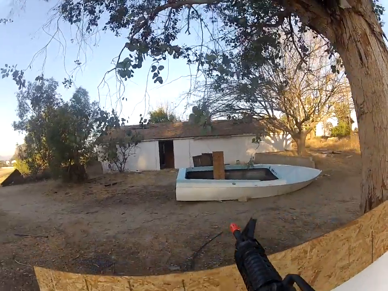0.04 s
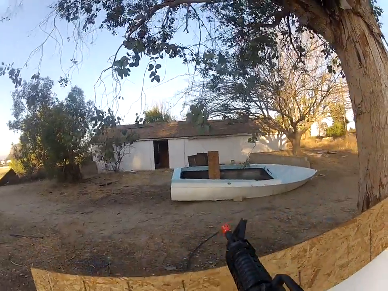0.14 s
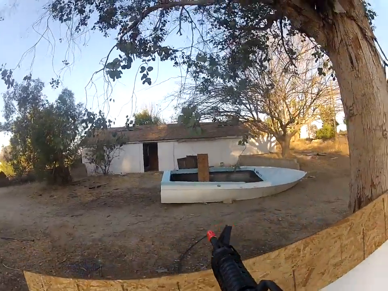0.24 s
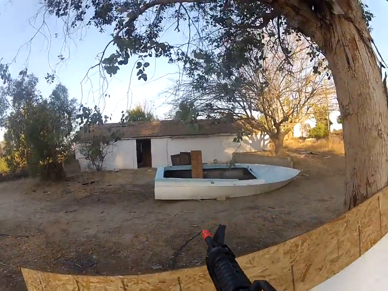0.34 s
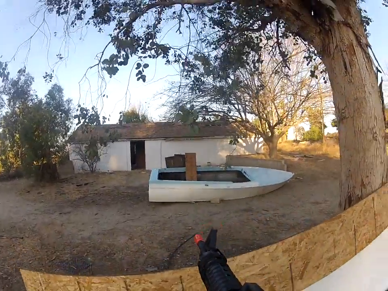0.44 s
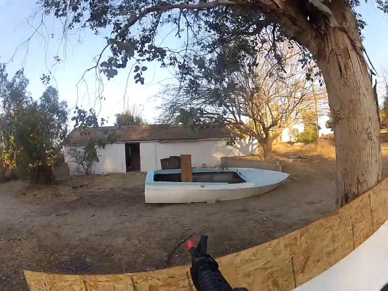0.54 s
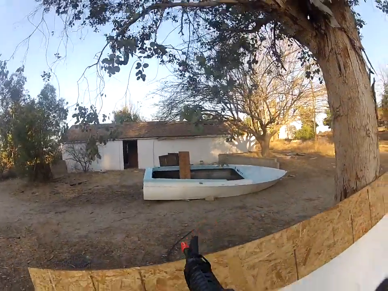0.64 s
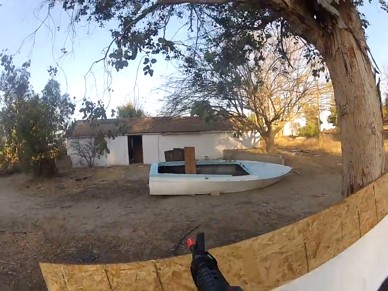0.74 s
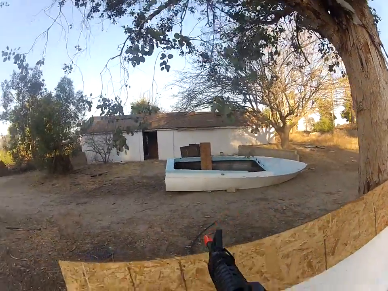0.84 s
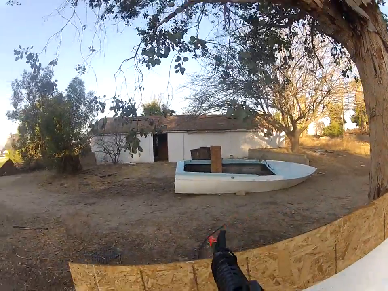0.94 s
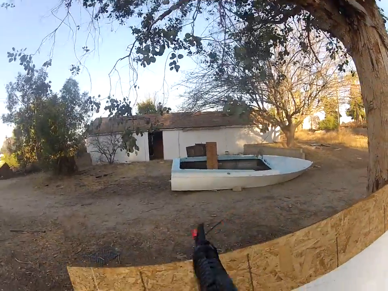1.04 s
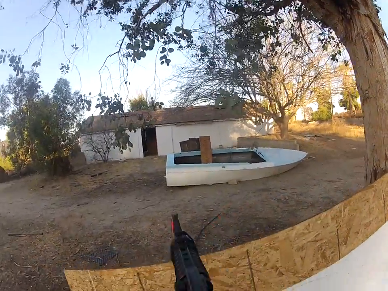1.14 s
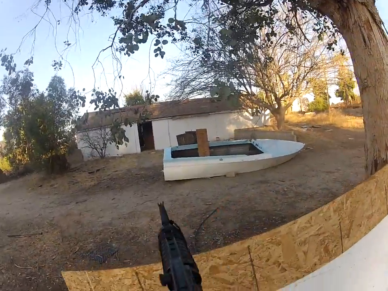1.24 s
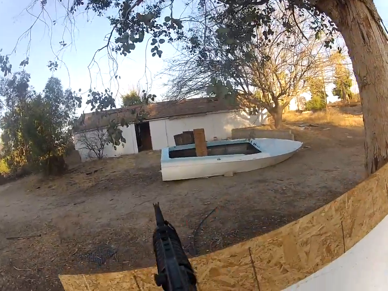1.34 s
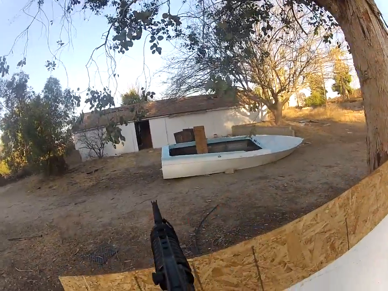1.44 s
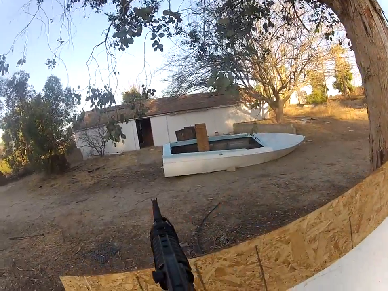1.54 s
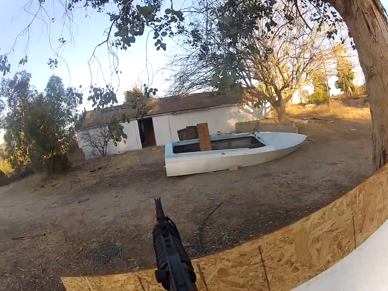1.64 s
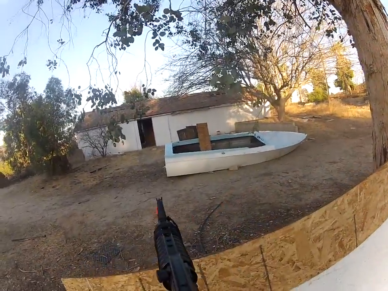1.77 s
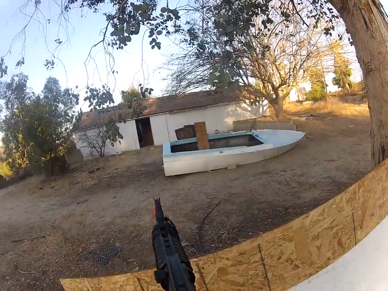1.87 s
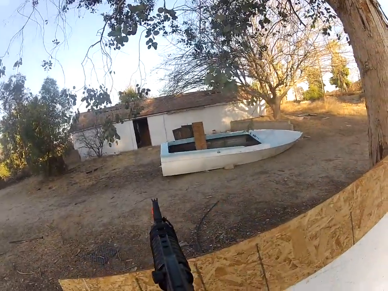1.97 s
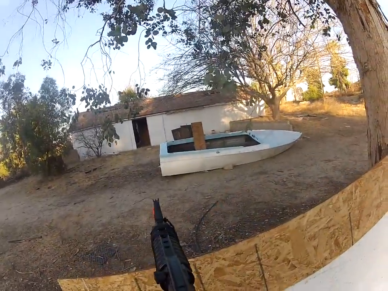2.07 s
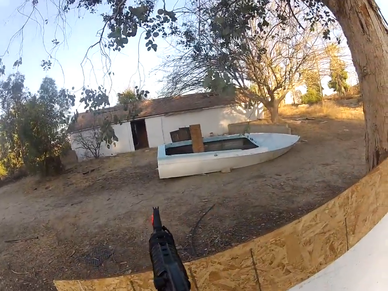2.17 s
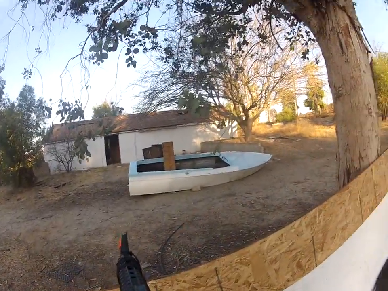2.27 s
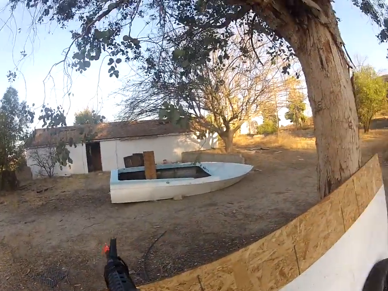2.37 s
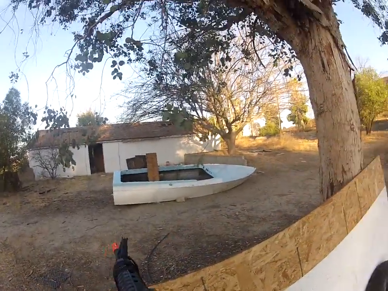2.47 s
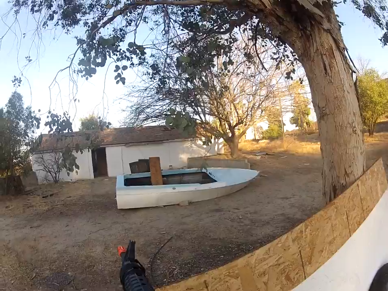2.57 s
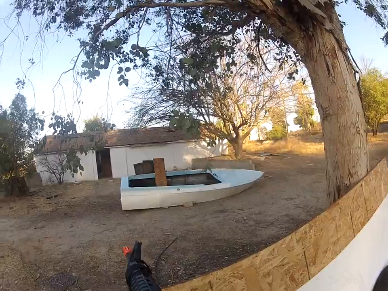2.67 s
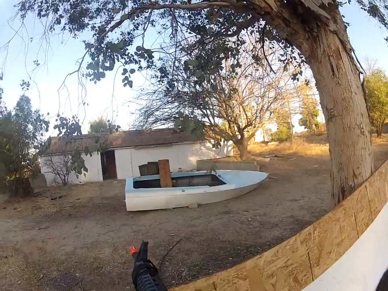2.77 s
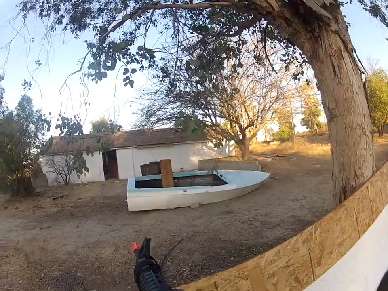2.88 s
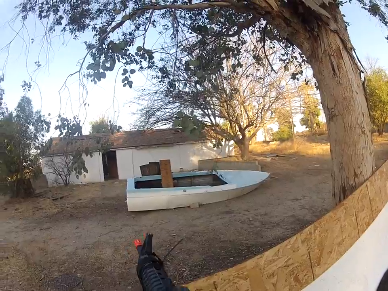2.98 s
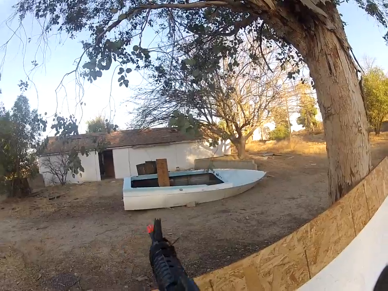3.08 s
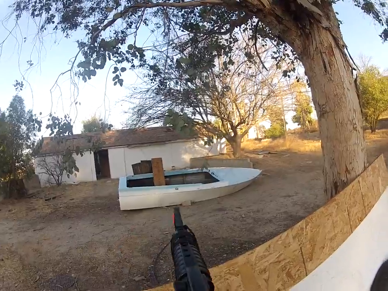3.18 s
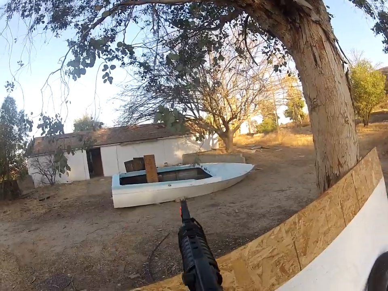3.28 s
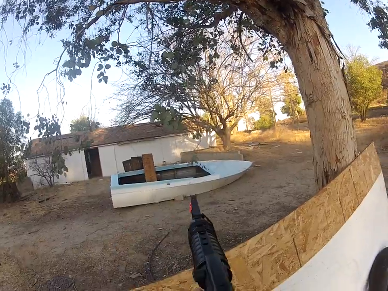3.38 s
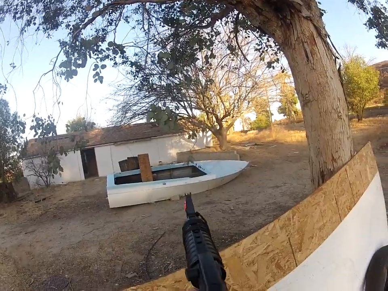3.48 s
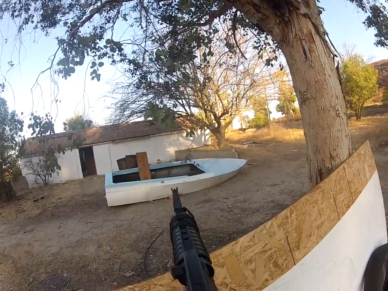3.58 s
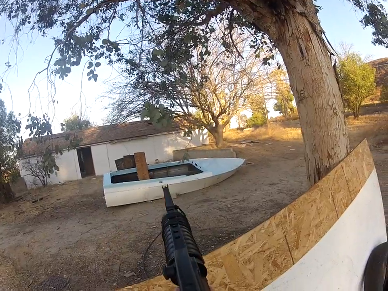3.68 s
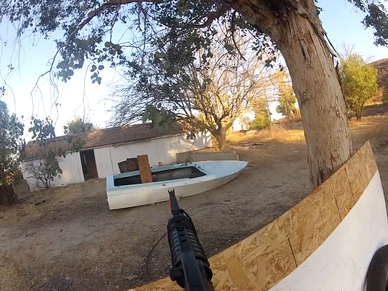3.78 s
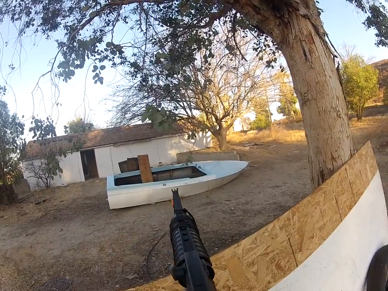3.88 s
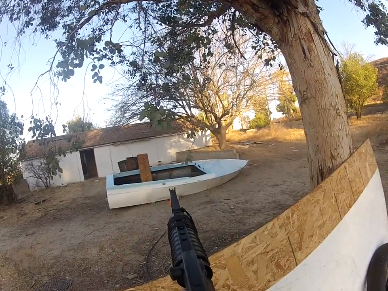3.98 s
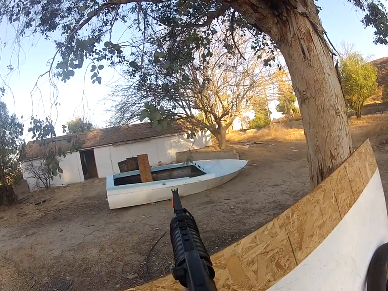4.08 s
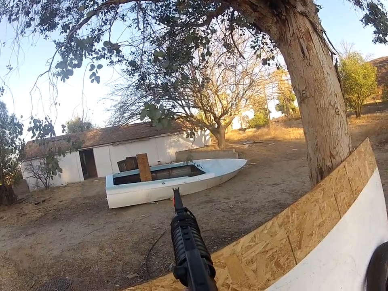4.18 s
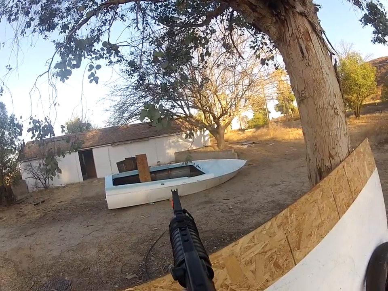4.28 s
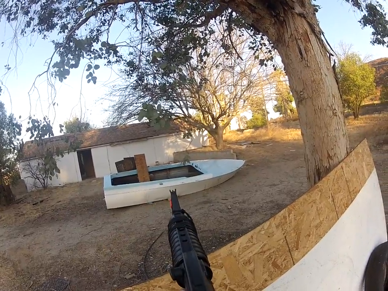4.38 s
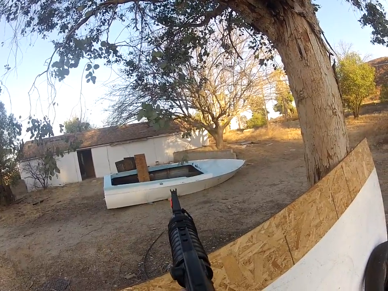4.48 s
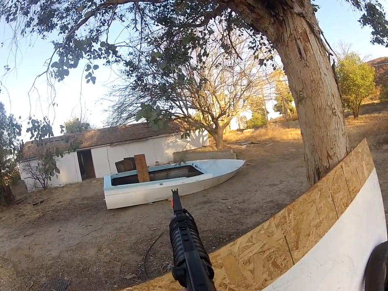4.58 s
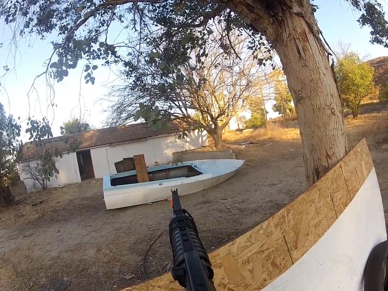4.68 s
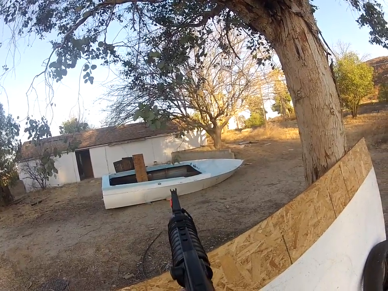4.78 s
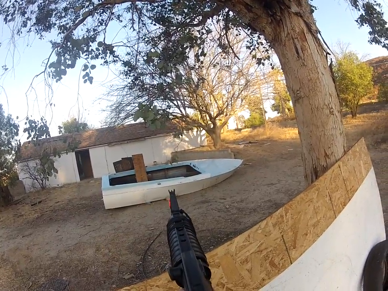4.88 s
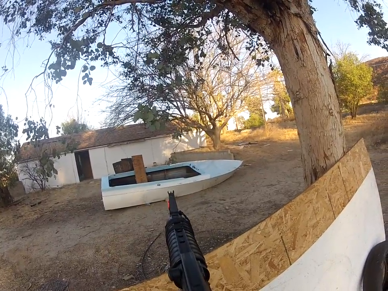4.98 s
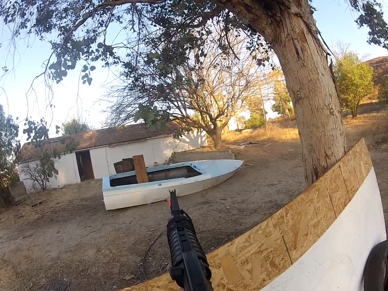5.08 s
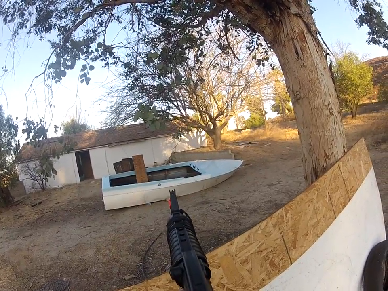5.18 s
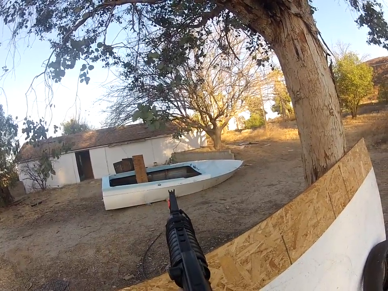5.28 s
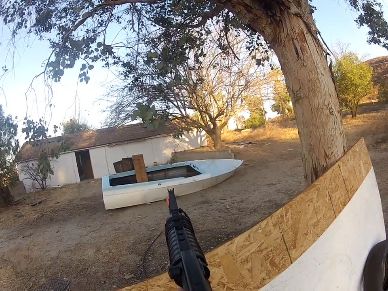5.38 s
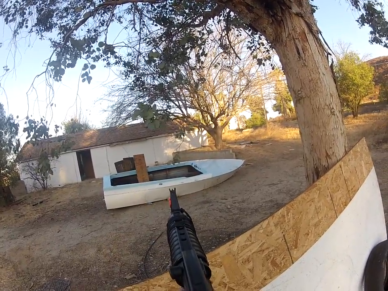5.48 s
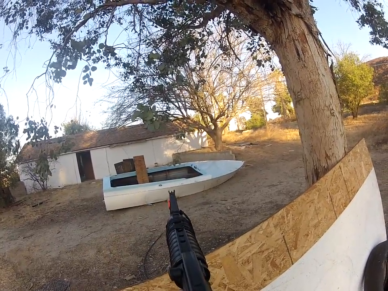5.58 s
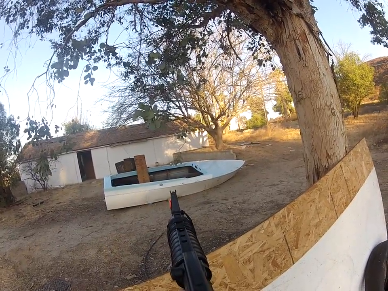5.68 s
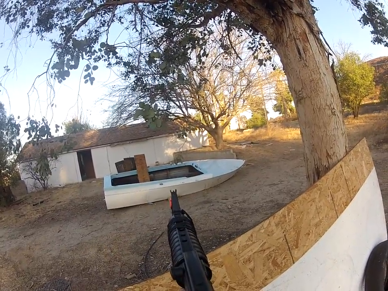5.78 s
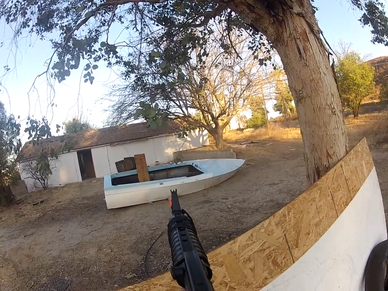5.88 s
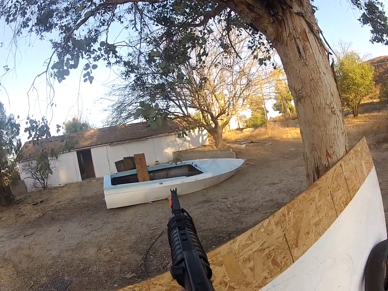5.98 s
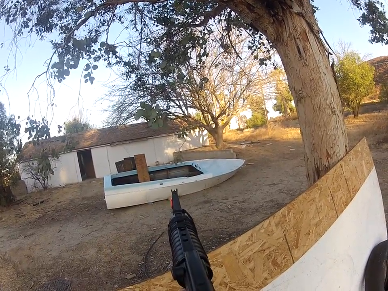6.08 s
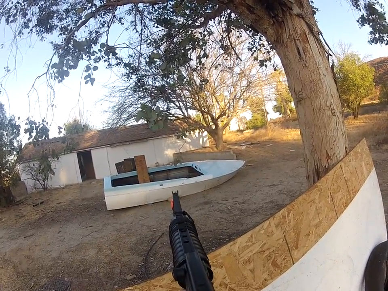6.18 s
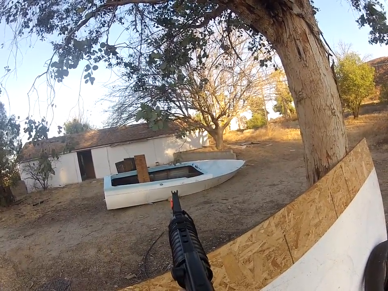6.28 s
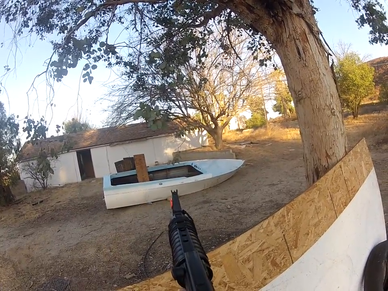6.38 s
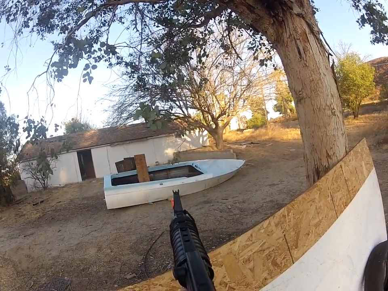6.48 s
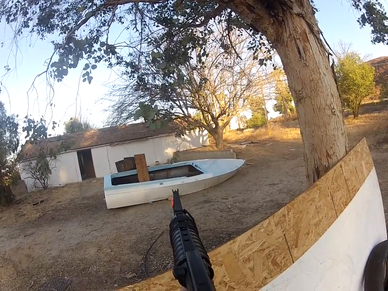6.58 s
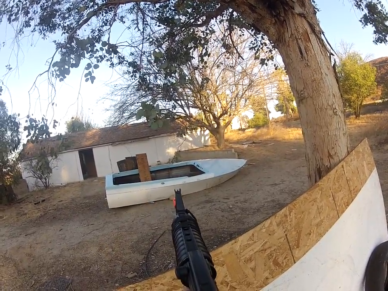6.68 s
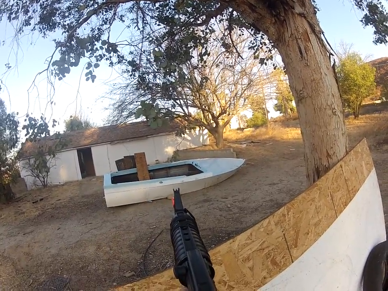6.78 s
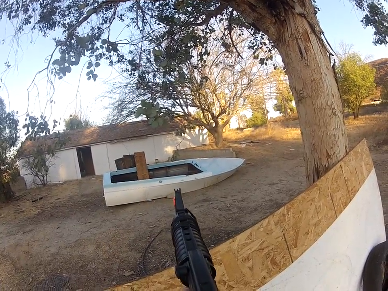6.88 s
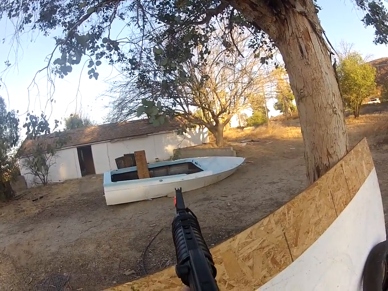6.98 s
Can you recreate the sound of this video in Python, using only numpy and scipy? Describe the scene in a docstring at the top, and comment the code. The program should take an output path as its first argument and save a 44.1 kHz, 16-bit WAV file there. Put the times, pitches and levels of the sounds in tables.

```python
"""A low outdoor rumble comes first, with soft small clicks; then an electric airsoft rifle fires in a quiet yard.
Heard from the shooter's head: a burst of three shots, three single shots, a quick pair and one last shot.
The rumble is filtered noise. The motor drives whining, scraping gears; clicks are short rattles that ring the case.
Each piston slam is a noisy crack with ringing metal and a pop of air from the barrel.
The recoil is a set of low thumps through the wearer, and faint echoes come back from the yard."""
import sys
import numpy as np
from scipy import signal
from scipy.fft import rfft, irfft, next_fast_len
from scipy.io import wavfile

SR = 44100
rng = np.random.default_rng(int(sys.argv[2]) if len(sys.argv) > 2 else 0)


def digitize_waveform(pressure):
    """Quantize a signal to 16-bit integers and store it at the path in sys.argv[1].

    Rows of a 2-D input are taken as channels; values are limited to [-1, 1].
    """
    field = np.atleast_2d(pressure).T
    bounded = np.clip(field, -1, 1)
    quanta = np.round(bounded * 32767).astype(np.int16)
    wavfile.write(sys.argv[1], SR, quanta)


N = 310023
TIME = np.arange(N) / SR  # seconds

# In all tables, level_db sets relative strength; filters and mixing change the final level.
# Outdoor rumble spectrum: pitch_hz, level_db (per Hz)
YARD_SPECTRUM = [(12, -26), (20, -3), (44, -1), (80, -9), (153, -11.5), (213, -12), (324, -16), (362, -16),
                 (686, -26.5), (3750, -37), (5090, -39), (6020, -46), (7110, -42), (14300, -49),
                 (15500, -51)]
YARD_DB = -56

# Further clicks of small parts, between and during the shots: start_s, level_db
FURTHER_CLICKS = [(0.21, -41.5), (1.771, -24.5), (4.2166, -40.5), (4.4392, -36.5), (4.688, -40),
                  (4.9274, -33), (5.527, -25), (5.901, -40), (5.9957, -44.5)]
# Resonances of the gearbox case: pitch_hz, width_hz, level_db
CASE_MODES = [(1022, 100, 2), (2057, 178, 10), (2250, 47, 5.5), (2550, 122, 5.5), (3090, 570, -4.5),
              (4460, 55, 5.5), (7500, 250, -0.5), (8950, 270, -3.5), (9440, 130, -3), (9890, 90, 0),
              (14400, 480, -5.5), (15030, 260, -13.5)]
# Spectrum of tiny hard contacts: pitch_hz, level_db (per Hz)
CRACK_SPECTRUM = [(90, -24.5), (250, 4.5), (470, -11), (900, -3.5), (1400, -9.5), (2500, 0.5), (4000, -7.5),
                  (6000, -11), (7500, -12), (9400, -10.5), (10600, -17), (12000, -34), (14500, -17),
                  (16000, -3.5)]
# Ringing of light steel levers such as the pawl: pitch_hz, level_db, ring_s (struck() shortens it)
LEVER_MODES = [(3020, -15.5, 0.034), (3620, -17, 0.032), (9000, -21, 0.029)]
# Ringing of the grip: pitch_hz, level_db, ring_s (struck() shortens it)
GRIP_MODES = [(1770, 3.5, 0.015), (2050, -1, 0.023), (2220, -2, 0.021), (2564, -3.5, 0.04),
              (9450, -13, 0.027), (9950, -10, .018), (13900, -7, .018), (14550, -12, .025)]
KNOCK_S, KNOCK_DB = 3.1332, -42  # the rifle knocks as it is raised

# Soft knocks of the stock against the shooter: start_s, level_db
STOCK_BUMPS = [(1.29, -40), (3.988, -46.5)]
RECOIL_HZ = 52.9

# Pulls of the trigger: motor_start_s, gears_stop_s, spin_up_s, coast_s, full_speed_hz (teeth per second),
# whir_db (at full speed), trigger_click_db
TRIGGER_PULLS = [(1.539, 1.741, .027, .07, 1290, -40.5, -32.5), (1.750, 1.93, .016, .10, 1025, -41, -40),
                 (3.7725, 3.9549, .036, 0.093, 1600, -38, -36.5),
                 (4.2599, 4.429, .042, 0.056, 1400, -39, -36.5), (4.906, 5.064, .03, .04, 1380, -41, -34),
                 (5.5101, 5.7296, .025, .11, 1460, -40, -32),
                 (6.0726, 6.2555, .028, 0.086, 1600, -38.5, -32)]
# Gear sound before the case rings: pitch_hz, level_db (per Hz)
GEARBOX_SPECTRUM = [(150, 8), (500, -7), (1050, 10.5), (1400, -25.5), (2100, 12), (2700, -5), (3700, -1.5),
                    (4500, 6), (6000, 0.5), (7600, -10.5), (9900, -29), (11900, -42.5), (14300, -26),
                    (16000, -29)]
WHIR_DB_PER_OCTAVE = 9.5  # the gears get louder with speed

# Piston slams: start_s, slam_db, recoil_db, stock_jolt_db, shoulder_jolt_db,
# catch_delay_s (until the gear catches the piston again), catch_db
PISTON_SLAMS = [(1.598, -15.5, -35, -41, -38.5, 0.021, -22.5), (1.704, -15, -35, -41, -41, 0.033, -32),
                (1.845, -14.5, -36.5, -41.5, -42, 0.045, -27),
                (3.861, -13.5, -34.5, -43.5, -56, 0.025, -25), (4.33, -13.5, -34, -39, -45, 0.024, -22),
                (4.957, -14.5, -35.5, -42.5, -54, 0.029, -28), (5.539, -14, -37, -44.5, -54, .0332, -23),
                (5.639, -14, -38, -52, -56, 0.044, -30), (6.163, -14.5, -40, -61, -62, 0.027, -25)]
# Ringing of the rifle body and spring: pitch_hz, level_db, ring_s (struck() shortens it)
RIFLE_MODES = [(688, -9, 0.036), (1710, -7, 0.036), (1906, -5, 0.047), (2107, 2.5, 0.032), (2474, 2, 0.043),
               (2620, -14, 0.023), (2977, -2, 0.059), (3100, -3, 0.056), (3617, -10, 0.067),
               (4220, -21, 0.027), (4480, -5, 0.038), (5200, -57, 0.02), (7130, -22, 0.011),
               (8340, -10.5, 0.027), (8930, -9.5, 0.053), (9600, -5, 0.031), (9950, -20, .02),
               (10990, -15.5, 0.047), (13300, -15, 0.046), (13900, -19, .025), (14500, -9, 0.043),
               (15000, -25, .03)]
# Air column of the barrel; its level is relative to the slam
BARREL_HZ, BARREL_WIDTH_HZ, BARREL_DB = 995, 158, -12

# The gears roll back against the latch: start_s, level_db
LATCH_CLACKS = [(3.9826, -26), (5.0849, -26.5), (5.7606, -30), (6.2895, -28)]
# Bounces of every latch clack: delay_s, level_db (relative to the clack)
BOUNCES = [(0, 0), (.008, -8.5), (.024, -12.5)]
# Time for each kind of rattle to fall by 60 dB, in seconds
TRIGGER_T60_S, CATCH_T60_S, LATCH_T60_S, CLICK_T60_S = 0.038, 0.028, 0.05, 0.031
PAWL_DB, PAWL_T60_S = -43.5, 0.056  # last tick of the pawl as the gears stop

# Echoes from hard surfaces around the yard: delay_s, level_db
YARD_ECHOES = [(.0075, -46), (.026, -30), (0.089, -30)]
CUTOFF_HZ = 15400


def from_db(db):
    """Turn decibels into a gain."""
    return 10 ** (np.asarray(db) / 20)


def rms_one(x):
    """Scale to an average (rms) strength of 1."""
    return x / np.sqrt(np.mean(x ** 2) + 1e-20)


def add(out, start_s, sound):
    """Mix a sound in at its start time."""
    at = int(round(start_s * SR))
    out[at:at + len(sound)] += sound[:N - at]


def dying(t, t60):
    """Fade that loses 60 dB in t60 seconds."""
    return np.exp(-np.log(1000) * t / max(t60, 1e-3))


def coloured(x, spectrum):
    """Filter to a spectrum without sound ahead of its cause (minimum phase); white noise keeps its power."""
    size = 2 * next_fast_len(x.shape[-1] // 2 + 2048)
    hz, level_db = np.transpose(spectrum)
    grid_hz = np.maximum(np.arange(size // 2 + 1) * SR / size, 1)
    gain = rms_one(from_db(np.interp(np.log(grid_hz), np.log(hz), level_db)))
    # folding the cepstrum forward in time gives the minimum-phase filter
    cepstrum = irfft(np.log(gain))
    cepstrum[1:size // 2] *= 2
    cepstrum[size // 2 + 1:] = 0
    filtered = irfft(rfft(x, size) * np.exp(rfft(cepstrum)))
    return filtered[..., :x.shape[-1]]


def resonate(x, hz, width_hz):
    """Resonance that favours one pitch, with gain 1 at its top."""
    r = np.exp(-np.pi * width_hz / SR)
    feedforward = np.array([1, 0, -1]) * (1 - r * r) / 2
    feedback = [1, -2 * r * np.cos(2 * np.pi * hz / SR), r * r]
    return signal.lfilter(feedforward, feedback, x)


def drift(rate_hz):
    """Random wander slower than rate_hz, with spread 1."""
    slow = signal.butter(2, rate_hz, fs=SR, output="sos")
    return rms_one(signal.sosfilt(slow, rng.standard_normal(N)))


def rattle(envelope, grain_db):
    """Dense tiny contacts of uneven size, shaped by an envelope."""
    size = from_db(grain_db * rng.standard_normal(len(envelope)))
    grains = rng.standard_normal(len(envelope)) * size
    return coloured(rms_one(grains) * envelope, CRACK_SPECTRUM)


def struck(body, t, scatter_db, contact_s):
    """A blow rings all modes, with random strengths and phases, swelling over the contact time."""
    hz, level_db, ring_s = np.transpose(body)[:, :, None]
    strength = from_db(level_db + scatter_db * rng.standard_normal(hz.shape))
    phase = 2 * np.pi * rng.random(hz.shape)
    # each mode loses 60 dB in 0.86 of its ring_s
    modes = strength * dying(t / ring_s, 0.86) * np.sin(2 * np.pi * hz * t + phase)
    return modes.sum(axis=0) * (1 - np.exp(-t / contact_s))


def case_ring(x):
    """The gearbox case answers whatever shakes it with its resonances."""
    out = 0
    for k, (hz, width_hz, level_db) in enumerate(CASE_MODES):
        out = out + (-1) ** k * from_db(level_db) * resonate(x, hz, width_hz)
    return out


def yard():
    """A low rumble fades upward into hiss, almost the same in both channels."""
    shared = rms_one(coloured(rng.standard_normal(N), YARD_SPECTRUM)) * from_db(0.48 * drift(12))
    side_spectrum = [(25, -17.0), (100, -6.5), (300, -8.5), (700, -19), (5000, -21.5), (14000, -41.5)]
    side = rms_one(coloured(rng.standard_normal(N), side_spectrum))
    opposite = np.array([[1], [-1]])
    return from_db(YARD_DB) * (shared + from_db(-23) * side * opposite)


def small_contacts():
    """List the clicks of trigger, piston catch, pawl, latch and other small parts: start_s, level_db, t60_s."""
    further = [(s, level_db, CLICK_T60_S) for s, level_db in FURTHER_CLICKS]
    triggers = [(s, click_db, TRIGGER_T60_S) for s, *_, click_db in TRIGGER_PULLS]
    catches = [(s + delay_s, catch_db, CATCH_T60_S) for s, *_, delay_s, catch_db in PISTON_SLAMS]
    pawls = [(stop_s, PAWL_DB, PAWL_T60_S) for _, stop_s, *_ in TRIGGER_PULLS]
    latches = [(s + delay_s, level_db + bounce_db, LATCH_T60_S)
               for s, level_db in LATCH_CLACKS for delay_s, bounce_db in BOUNCES]
    return further + triggers + catches + pawls + latches


def clicks():
    """Small metal parts rattle briefly and ring the case; the grip gives a hollower knock."""
    contacts, t = np.zeros(N), TIME[:SR // 8]
    for s, level_db, t60 in small_contacts():
        envelope = dying(t, t60) * (1 - np.exp(-t / 0.00037))
        add(contacts, s, from_db(level_db - 11) * rattle(envelope, grain_db=4.5))
    hollow = from_db(-6.5) * resonate(contacts, 900, 350)
    out = contacts + from_db(-2.5) * case_ring(contacts) + hollow
    knock = struck(GRIP_MODES, t, scatter_db=2, contact_s=0.00076)
    knock += from_db(-3.5) * rattle(dying(t, 0.021), grain_db=3)
    add(out, KNOCK_S, from_db(KNOCK_DB) * knock)
    return out


def levers():
    """The pawl's last tick and the further clicks each set a light steel lever ringing."""
    out, t = np.zeros(N), TIME[:SR // 8]
    pawls = [(stop_s, PAWL_DB) for _, stop_s, *_ in TRIGGER_PULLS]
    for s, level_db in pawls + FURTHER_CLICKS:
        add(out, s, from_db(level_db) * struck(LEVER_MODES, t, scatter_db=1.0, contact_s=0.00077))
    return out


def thump(hz, t60):
    """A low, soft swing of the body that carries the microphone."""
    t = TIME[:SR // 4]
    return -np.sin(2 * np.pi * hz * t) * dying(t, t60) * (1 - np.exp(-t / 0.0031))


def recoil():
    """Soft bumps nudge the shooter; each shot jolts stock and shoulder and leaves the body rocking."""
    out = np.zeros(N)
    for s, level_db in STOCK_BUMPS:
        add(out, s - .001, from_db(level_db + 5.5) * thump(hz=171, t60=0.027))
        add(out, s + 0.0033, from_db(level_db + 8.0) * thump(hz=RECOIL_HZ, t60=0.15))
    for s, _, recoil_db, stock_db, shoulder_db, *_ in PISTON_SLAMS:
        add(out, s - .005, from_db(stock_db + 12.0) * thump(hz=169.7, t60=0.043))
        add(out, s + 0.0032, from_db(shoulder_db + 14) * thump(hz=102.0, t60=0.069))
        add(out, s + 0.0052, from_db(recoil_db + 8.0) * thump(hz=RECOIL_HZ, t60=0.18))
    return out


def motor():
    """At each pull the motor nears full speed, then coasts, losing energy at a steady rate."""
    mesh_hz, gain = np.zeros(N), np.zeros(N)  # gear teeth per second, and loudness of the whir
    for start_s, stop_s, spin_up_s, coast_s, full_hz, whir_db, _ in TRIGGER_PULLS:
        spin_up = 1 - np.exp(-np.maximum(TIME - start_s, 0) / spin_up_s)
        # energy goes with speed squared, so a steady energy loss gives a square root
        speed = spin_up * np.sqrt(np.clip((stop_s - TIME) / coast_s, 0, 1))
        loudness = from_db(whir_db) * speed ** np.log2(from_db(WHIR_DB_PER_OCTAVE))
        mesh_hz = np.maximum(mesh_hz, full_hz * speed)
        gain = np.maximum(gain, loudness)
    return mesh_hz, gain


def overtones(phase, count):
    """Overtones from the second up to count, weaker the higher they are, with random phases."""
    return sum(np.cos(k * phase + 2 * np.pi * rng.random()) / k for k in range(2, count + 1))


def gears():
    """Two gear pairs whine with the motor; whine and scraping, uneven over each turn, ring the case."""
    mesh_hz, gain = motor()
    speed_hz = mesh_hz * (1 + 0.00985 * drift(312))
    phase = 2 * np.pi * np.cumsum(speed_hz) / SR
    bevel = 0.21 * np.cos(phase) + overtones(phase, 10)
    spur = overtones(.79 * phase, 6)
    scrape_swell = (1 + 0.64 * np.cos(phase)) * from_db(3.1 * drift(340))
    scrape = rms_one(rng.standard_normal(N) * scrape_swell)
    whine_share = .6 * from_db(3 * drift(110))
    turn_swell = 1 + 0.19 * np.cos(phase / 10)  # one turn every ten teeth
    teeth = (whine_share * (bevel + .5 * spur) + scrape) * turn_swell
    case = coloured(teeth, GEARBOX_SPECTRUM) + from_db(11.0) * case_ring(teeth)
    return gain * case / np.std(case[mesh_hz > 0])


def slams():
    """The piston rushes forward, taps the cylinder head and slams home; pushed air rings in the barrel."""
    out, t = np.zeros(N), TIME[:SR // 8]
    rush_s, tap_s = 0.01, 0.00068  # lead ahead of the slam
    impact_s, pop_s = 0.001009, 0.002084  # delay after the slam's start
    bright = signal.butter(2, 3500, "high", fs=SR, output="sos")
    for s, slam_db, *_ in PISTON_SLAMS:
        gain = from_db(slam_db)
        rush = from_db(-13 * (0.5 - TIME[:int(rush_s * SR)] / rush_s))  # swells by 13 dB
        add(out, s - rush_s, gain * from_db(-24.0) * rattle(rush, grain_db=1.0))
        tap = signal.sosfilt(bright, rattle(dying(t, 0.0044), grain_db=1.5))
        add(out, s - tap_s, gain * from_db(-16.5) * tap)
        # a longer, quieter rattle surrounds the main impact
        add(out, s, gain * from_db(-23) * rattle(dying(t, .07), grain_db=3))
        add(out, s + impact_s, gain * from_db(-7.5) * rattle(dying(t, 0.012), grain_db=5.5))
        ringing = struck(RIFLE_MODES, t, scatter_db=1.5, contact_s=0.0009)
        add(out, s, gain * from_db(-13.5) * ringing)
        push = np.sin(2 * np.pi * BARREL_HZ * t) * dying(t, 0.012)
        barrel_hz = BARREL_HZ * (1 + 0.0066 * rng.standard_normal())
        air = resonate(push, barrel_hz, BARREL_WIDTH_HZ)
        add(out, s + pop_s, gain * from_db(BARREL_DB) * air / np.abs(air).max())
        # turbulent air leaving the muzzle roughens the pop
        puff = resonate(rng.standard_normal(len(t)) * dying(t, 0.053), 883, 460)
        add(out, s + pop_s, gain * from_db(-9.0) * puff)
    return out


def yard_echoes(x):
    """Hard surfaces around the yard send back faint, dull, delayed copies."""
    out = np.zeros(N)
    dull = signal.sosfilt(signal.butter(1, 5000, fs=SR, output="sos"), x)
    for delay_s, level_db in YARD_ECHOES:
        add(out, delay_s, from_db(level_db) * dull)
    return out


def scene():
    """Rifle, recoil and echoes are the same in both channels; only the yard differs slightly."""
    rifle = clicks() + levers() + gears() + slams()
    return yard() + recoil() + rifle + yard_echoes(rifle)


def record(dry):
    """The sound has two hollows in the treble, and the very top is cut."""
    for hz, width_hz, depth in [(5950, 920, 0.59), (12000, 950, 0.23)]:
        dry = dry - depth * resonate(dry, hz, width_hz)
    top_cut = signal.ellip(8, .1, 80, CUTOFF_HZ, fs=SR, output="sos")
    return signal.sosfilt(top_cut, dry)


dry = scene()
out = record(dry)
digitize_waveform(out)
```